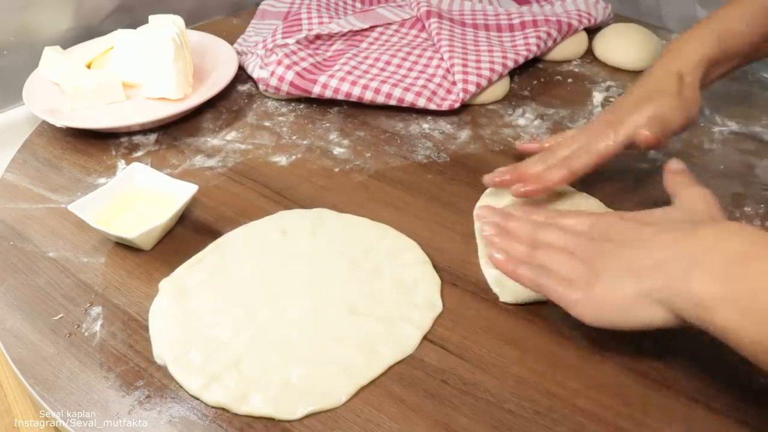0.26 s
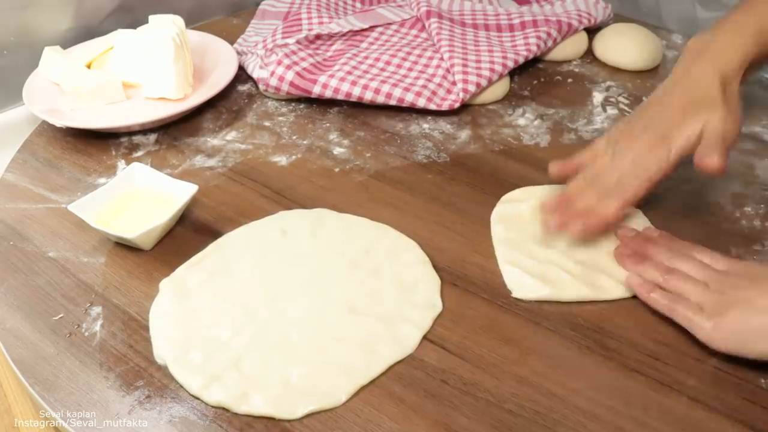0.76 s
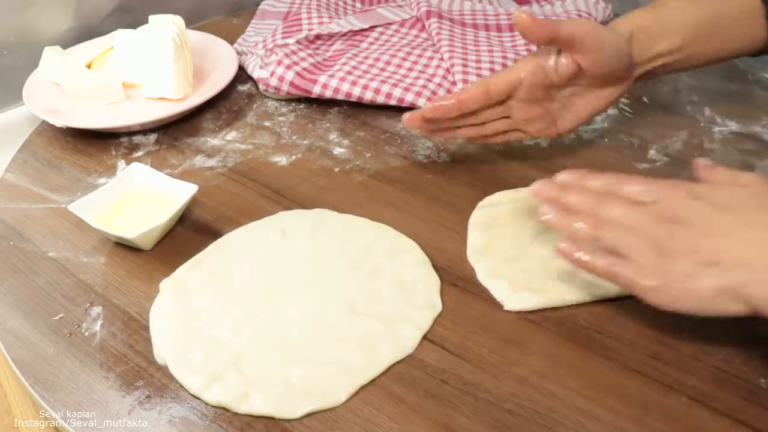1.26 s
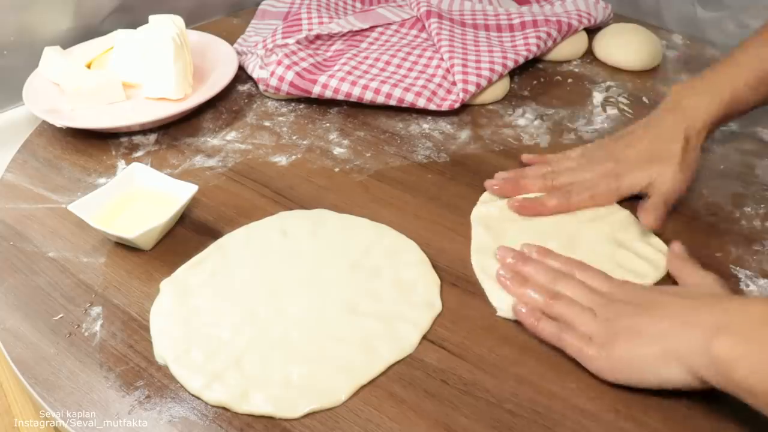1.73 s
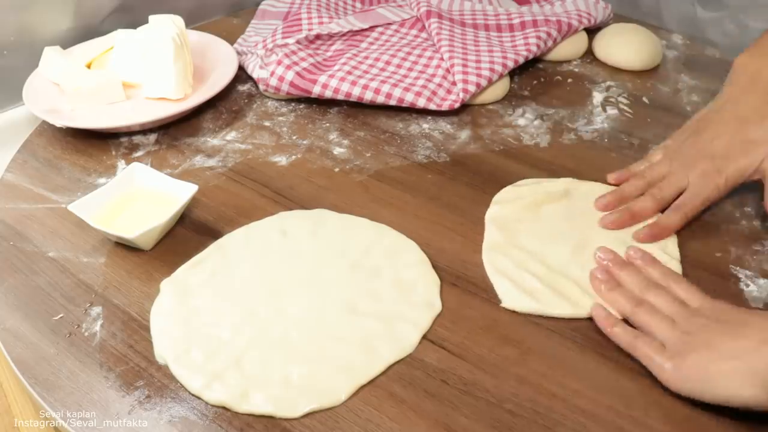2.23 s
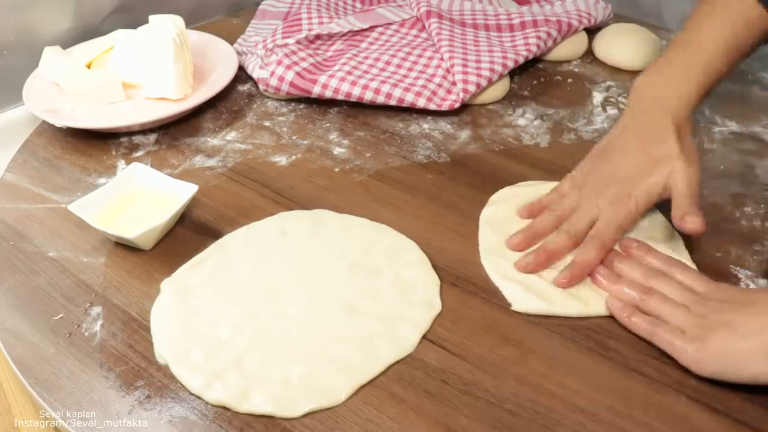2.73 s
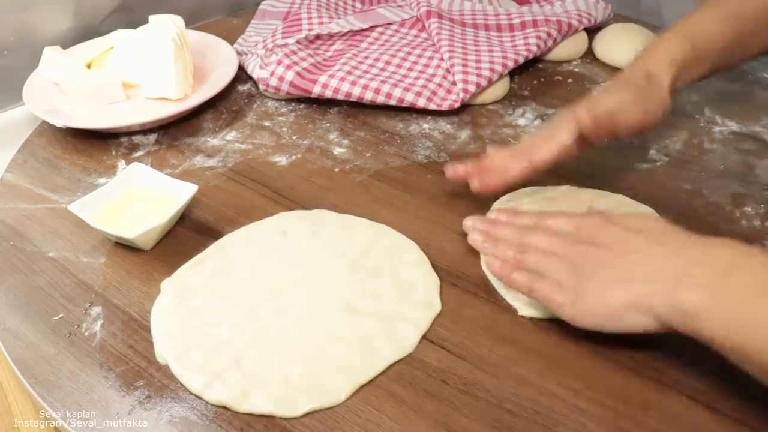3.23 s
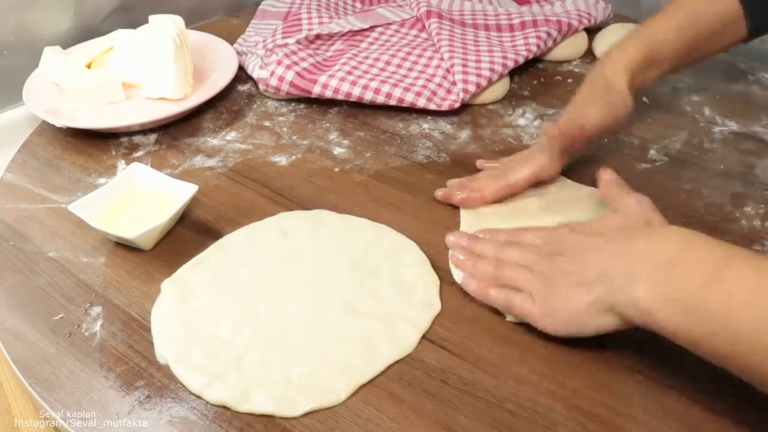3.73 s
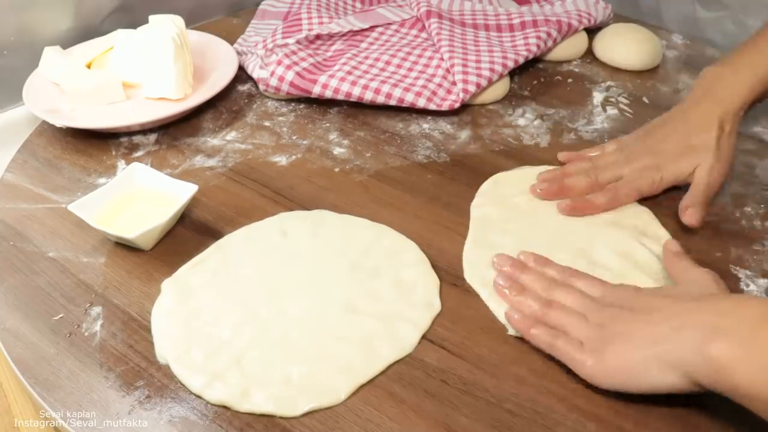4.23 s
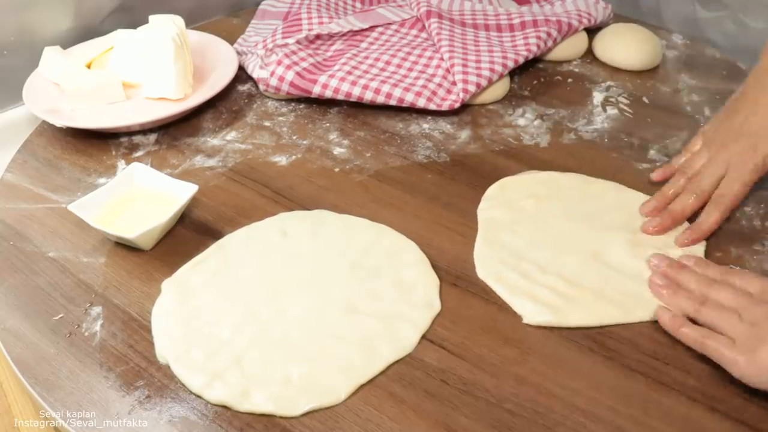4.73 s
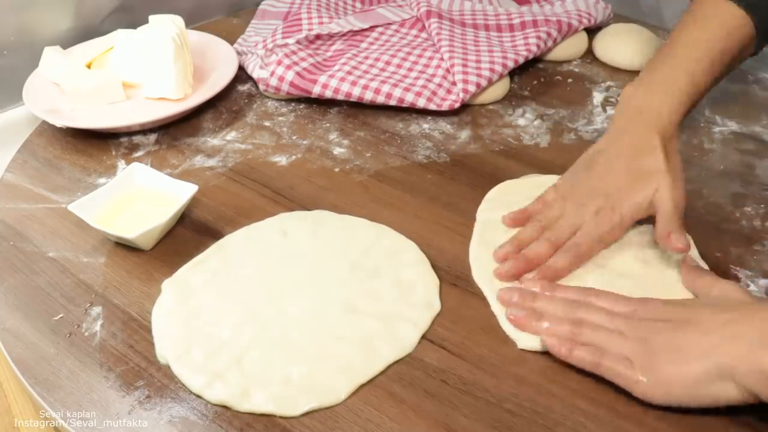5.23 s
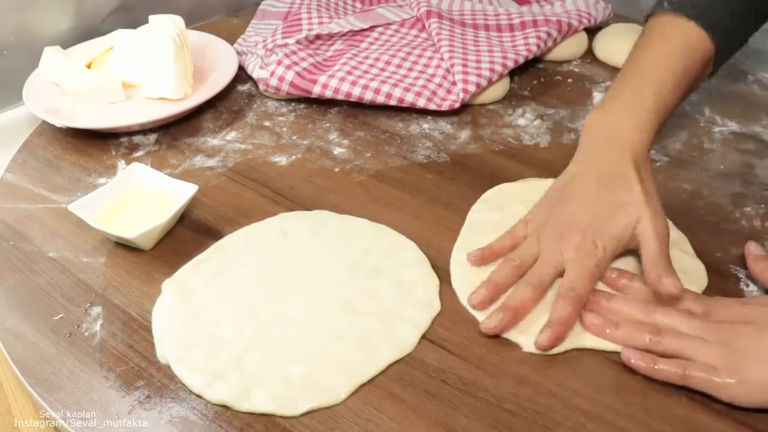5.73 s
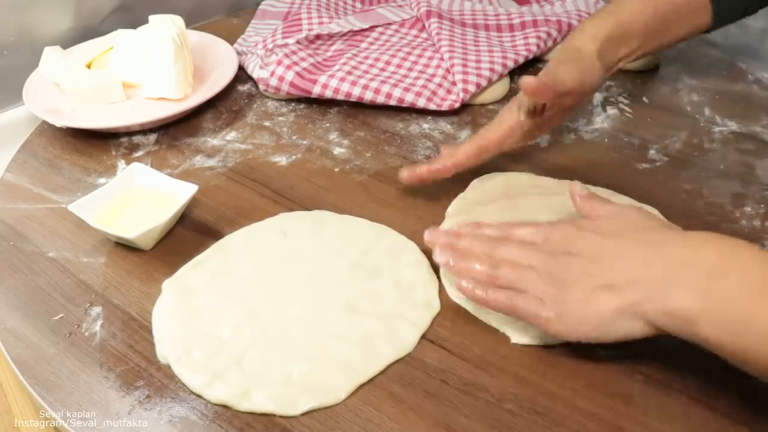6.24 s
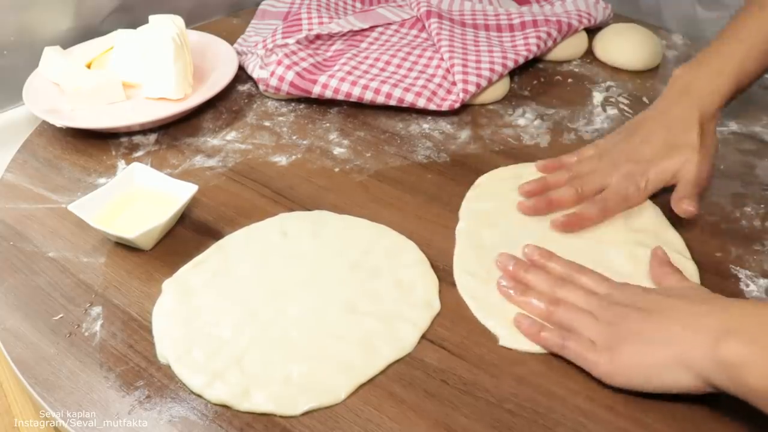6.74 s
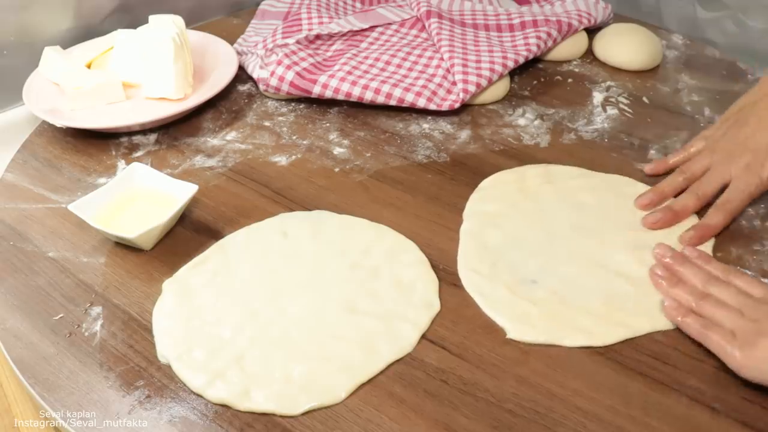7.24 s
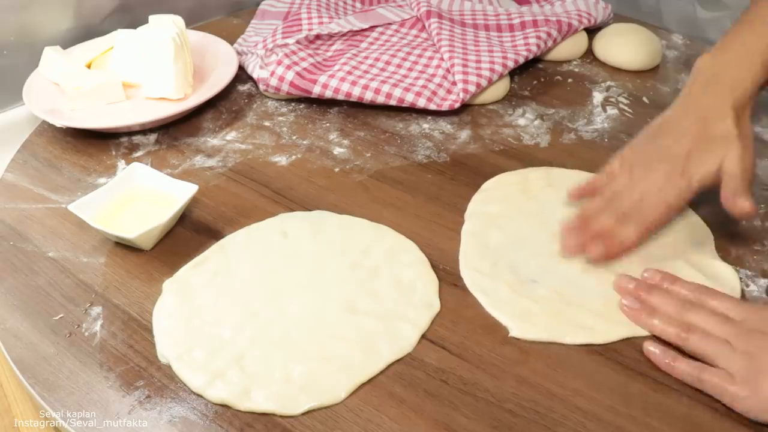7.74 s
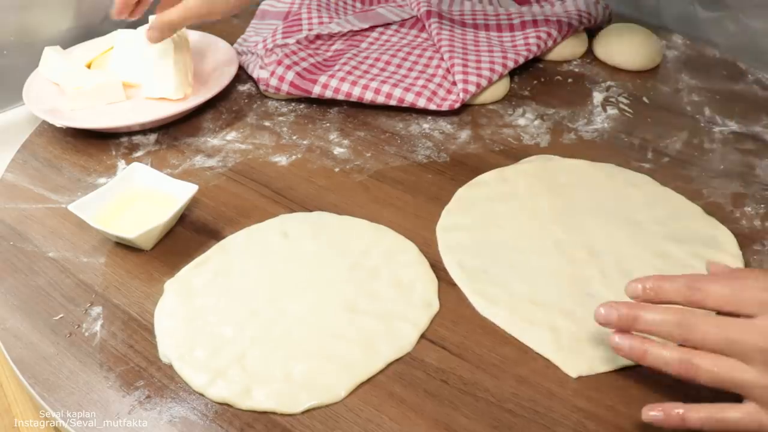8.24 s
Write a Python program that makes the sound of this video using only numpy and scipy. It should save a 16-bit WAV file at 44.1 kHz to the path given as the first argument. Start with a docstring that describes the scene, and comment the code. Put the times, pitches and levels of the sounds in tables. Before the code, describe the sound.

Oily fingers slap and press soft dough on a wooden board about four times a second, with dull thumps, sticky pops and faint peeling rustles.

```python
"""Oiled fingers pat soft dough flat on a round wooden board in a small kitchen.
Each pat thumps the board and its table (ringing modes) and smacks air out from under the fingers (lumpy noise).
Skin peels off the dough with small pops and a rustle, and at times brushes the oiled wood with a narrow whistle.
The kitchen answers briefly at two microphone ports; a cut at 8 s ends every ring and echo of the hands.
Behind it all lies steady noise with a thin, slightly wavering appliance tone."""
import sys
import numpy as np
from scipy import signal
from scipy.fft import rfft, irfft, next_fast_len
from scipy.io import wavfile

SR = 44100
rng = np.random.default_rng(int(sys.argv[2]) if len(sys.argv) > 2 else 0)


def inscribe(sig):
    """Save sig as 16-bit PCM at rate SR to the path in sys.argv[1].

    A 1-D sig is mono; a 2-D sig holds one channel per row.
    Samples are clipped to [-1, 1] before scaling.
    """
    pcm = np.round(np.clip(np.atleast_2d(sig).T, -1, 1) * 32767)
    wavfile.write(sys.argv[1], SR, pcm.astype(np.int16))


N = 373968
TIME = np.arange(N) / SR
CUT_S = 8.001  # a cut at 8 s ends every ring and echo of the hands; the background runs on


def from_db(db):
    """Amplitude ratio of a level in dB."""
    return 10 ** (np.asarray(db) / 20)


def rms_one(x):
    """Scales a signal to an rms of one."""
    return x / np.sqrt(np.mean(x ** 2) + 1e-20)


def at_hz(points, hz, axis=1):
    """Reads a column of a table at a frequency, straight over log frequency."""
    points = np.array(points)
    return np.interp(np.log(hz), np.log(np.maximum(points[:, 0], 1)), points[:, axis])


def band(x, low_hz, high_hz):
    """Band-pass filter."""
    sos = signal.butter(2, [low_hz, min(high_hz, 20000)], "band", fs=SR, output="sos")
    return signal.sosfilt(sos, x)


def add(track, start_s, sound):
    """Lays a sound on the track; what began before the cut ends there."""
    start = round(start_s * SR)
    limit = round(CUT_S * SR) if start_s < CUT_S else N
    end = min(start + len(sound), limit)
    track[start:end] += sound[:end - start]


def noise_and_strengths():
    """Returns white noise and random strengths up to a ceiling, from which callers make uneven grains."""
    return rng.standard_normal(N), np.minimum(rng.exponential(1, N), 3)


# Pats on the dough; the faint ones just ahead of a strong one are fingertips touching first.
# Columns: start_s, smack_db (1.4-7 kHz), body_db (smack, 0.4-2.5 kHz), spread_ms (of the landing),
# sway_db (table), low_db, middle_db, high_db (board), press_ms, damping (by the hand, ratio)
PATS = [(0.0044, -51, -43, 1.3, -47, -35.5, -45.5, -43, 6.4, 1.8),
        (0.2353, -11, -11.5, 2.3, -37, -29, -24.5, -21.5, 12, 1.1),
        (0.4642, -11.5, -7, 0.44, -50, -22, -28.5, -28, 10, 0.76),
        (0.664, -30, -30, 1.8, -59, -41, -37, -29, 2.7, 2.2),
        (0.6686, -20.5, -23.5, 2, -44, -40, -36, -26, 14, 1.3),
        (0.905, -36, -31, 2.8, -37, -40, -57, -48, 11, 1.3),
        (0.9466, -25, -35, 1.6, -49, -21, -23, -31, 9.5, 1.2),
        (0.9538, -22, -19, 1.2, -57, -35, -30, -38, 6.6, 1.3),
        (1.2061, -23.5, -19.5, 2.5, -45, -25.5, -21.5, -33, 5.3, 0.92),
        (1.5114, -21, -26.5, 7, -39.5, -36.5, -37, -38.5, 10, 0.5),
        (1.8257, -12.5, -12, 5.9, -40, -20, -27, -22, 9.9, 0.66),
        (2.0878, -15, -10.5, 0.92, -39, -20.5, -23.5, -17, 5.7, 0.85),
        (2.312, -21.5, -17, 2.7, -35, -28, -37.5, -22, 21.4, 1.14),
        (2.529, -48, -24.5, 2, -55, -32, -35, -33, 3, 2.5),
        (2.5348, -24.5, -24, 0.41, -40, -21, -26.5, -24, 14, 3.4),
        (2.7758, -40, -29.5, 1.9, -36, -31, -43, -35, 8.4, 0.94),
        (2.8193, -21.5, -14, 3.3, -47, -20.5, -20.5, -20.5, 11, 1.14),
        (3.0815, -30.5, -26, 1.9, -43, -29.5, -28.5, -36, 5.3, 0.98),
        (3.4183, -25.5, -33, 6, -50, -36.5, -38, -37.5, 13, 1.04),
        (3.7344, -14.5, -11.5, 5.8, -37, -22, -35, -21, 13, 0.9),
        (4.0435, -17, -13.5, 3.1, -39.5, -19.5, -24, -25, 12.5, 1),
        (4.2954, -9.5, -9.5, 1.06, -45, -24, -25.5, -23, 5.9, 0.51),
        (4.5439, -20, -17.5, 4.7, -58, -22, -33, -20.5, 19, 1.7),
        (4.769, -67, -35, 2.1, -55, -41, -42, -30, 3.8, 2.5),
        (4.7757, -26, -29.5, 1.2, -36, -26, -43, -24.5, 16.6, 2.2),
        (5.0642, -25, -20, 4.9, -30.5, -28, -28.5, -29.5, 40.5, 3.2),
        (5.3282, -29.5, -21, 1.7, -40, -34, -39.5, -40, 9.4, 0.38),
        (5.594, -24.5, -24.5, 7.3, -47, -31.5, -37, -37, 22, 0.68),
        (5.8621, -31, -27, 0.9, -39.5, -27, -30, -34, 3.4, 1.05),
        (6.1545, -25.5, -24, 5.5, -43, -25.5, -26, -30, 5.9, 0.68),
        (6.1844, -36, -33, 0.81, -30, -19, -30.5, -50, 13, 2.3),
        (6.496, -25, -37, 1.2, -48, -29, -39, -40, 3, 2.7),
        (6.5003, -13, -10.5, 1.2, -39.5, -26, -27.5, -28.5, 5.7, 0.47),
        (6.772, -9.5, -12, 5.3, -50, -21, -25.5, -22.5, 6.1, 0.51),
        (7.0324, -36, -20, 2.6, -38.5, -20.5, -27, -31, 14, 1.2),
        (7.264, -38, -34, 2.1, -57, -29, -38, -29, 2.6, 1.7),
        (7.2711, -18, -19, 0.7, -44, -24, -36, -25.5, 7.7, 1.2),
        (7.5748, -32, -27, 2.6, -54, -37.5, -35, -30, 20, 1.2),
        (7.6016, -14.5, -21, 1.05, -35, -23.5, -29.5, -19.5, 5.7, 1.4),
        (7.876, -28, -26.5, 4.1, -56, -30, -28, -27.5, 22, 2.3),
        (7.9039, -21.5, -24.5, 1.6, -37, -20, -23, -21, 9.3, 1.5),
        (8.0795, -22, -21.5, 1.7, -38, -22.5, -31, -45, 7, 1.6)]
# Ringing modes of table and board: pitch_hz, level_db (relative), t60_s (before the hand's damping)
WOOD = [(39.5, -4, 0.35), (47.5, 2.5, 1), (95, -3.5, 0.53), (108.6, 1.5, 0.33), (162.7, 1, 0.059),
        (184.6, 5, 0.12), (205.7, -4, 0.12), (232.8, -6, 0.44), (261.7, 6.5, 0.19), (301.6, -7.5, 0.32),
        (336.4, -9.5, 0.17), (372, -1.5, 0.19), (401, -5.5, 0.28), (440, -14, 0.12), (486.2, -7, 0.075)]
# Borders between table sway, table top, low, middle and high board [Hz]
WOOD_PARTS_HZ = [70, 140, 215, 330]
TOP_FOLLOWS_BOARD, TOP_DB = 0.62, -2.5  # the table top's level lies between sway and low board
GRIP = 1.21     # the hand damps harder the longer it rests: the fade steepens with this power of time
GRIP_S = 0.038  # time after the press at which the fade equals that of a plain exponential ring


def thumps():
    """Every pat drives all wood modes while the dough gives way; then they die, damped by the resting hand."""
    out = np.zeros(N)
    phases = rng.uniform(-1.52, 1.57, (len(PATS), len(WOOD)))
    variations_db = rng.normal(0, 2.3, phases.shape)  # each mode's level varies at random from pat to pat
    for pat, pat_phases, pat_variations_db in zip(PATS, phases, variations_db):
        sway_db, low_db, middle_db, high_db, press_ms, damping = pat[4:]
        top_db = TOP_DB + sway_db + TOP_FOLLOWS_BOARD * (low_db - sway_db)
        parts_db = [sway_db, top_db, low_db, middle_db, high_db]
        for (hz, mode_db, t60), phase, variation_db in zip(WOOD, pat_phases, pat_variations_db):
            press = press_ms / 1000 + 2.23 / hz  # s; slow modes take longer to swell
            t = TIME[:min(SR // 2, round((press + t60 / damping) * SR))]
            swell = np.sin(np.pi / 2 * np.minimum(t / press, 1)) ** 0.62
            rested = np.maximum(t - press, 0) / GRIP_S
            fade_db = 60 * GRIP_S * rested ** GRIP * damping / t60
            part_db = parts_db[np.searchsorted(WOOD_PARTS_HZ, hz)]
            gain = from_db(part_db + mode_db + variation_db - fade_db)
            add(out, pat[0], gain * swell * np.sin(2 * np.pi * hz * t + phase))
    return out


SMACK_RISE = 0.68                            # share of the landing's spread
SMACK_DECAY_MS, SMACK_DECAY = 2.96, 0.85     # a base plus a share of the spread, before each band's slowness
UPPER_BODY_DB = -5.5                         # upper half of the body against the lower
AIR_DB, AIR_GROWTH = -10, 1.05               # the top band grows faster than the smack


def smacks():
    """Air and oil squeezed out finger by finger: lumpy noise, later and longer in the low bands."""
    out, t_ms = np.zeros(N), TIME[:SR // 8] * 1000
    noise, strength = noise_and_strengths()
    grains = noise * from_db(3.0 * strength)
    lumps = rms_one(band(rng.standard_normal((2, N)), 55, 196))  # fingers do not land together
    starts, smack_db, body_db, spreads_ms = np.transpose(PATS)[:4]
    # levels_db, low_hz, high_hz, slowness
    bands = [(body_db, 422, 1456, 1.79),
             (body_db + UPPER_BODY_DB, 1057, 2575, 1.57),
             (smack_db, 1420, 6950, 0.98),
             (AIR_DB + AIR_GROWTH * smack_db, 8000, 15500, 0.69)]
    for k, (levels_db, low_hz, high_hz, slowness) in enumerate(bands):
        envelope = np.zeros(N)
        for start, level_db, spread_ms in zip(starts, levels_db, spreads_ms):
            rise_ms = slowness * SMACK_RISE * spread_ms
            decay_ms = slowness * (SMACK_DECAY_MS + SMACK_DECAY * spread_ms)
            swell = (1 - np.exp(-t_ms / rise_ms)) ** 1.68
            add(envelope, start, from_db(level_db) * swell * np.exp(-t_ms / decay_ms))
        lumpiness = from_db(2.49 * lumps[k // 2])  # one for the two body bands, one for the two above
        out += envelope * lumpiness * rms_one(band(grains, low_hz, high_hz))
    return out


# Air pockets that burst under a landing or lifting finger: start_s, level_db, pitch_hz
POPS = [(0.108, -24, 6700), (0.238, -12, 3130), (0.324, -34, 5750), (0.371, -25.5, 7000),
        (0.4657, -3.5, 5360), (0.9082, -24, 5550), (0.9487, -12.5, 2340), (0.9564, -15, 5480),
        (1.2121, -19, 2550), (1.5194, -14, 3640), (1.531, -20, 4240), (1.8272, -5.5, 4150),
        (1.845, -21, 3800), (2.087, -29, 7040), (2.3155, -34, 3860), (2.3246, -17.5, 7500),
        (2.537, -17.5, 10300), (2.8205, -14, 4600), (2.8747, -33.5, 10700), (3.0857, -22.5, 2190),
        (3.426, -28, 6050), (3.5714, -34.5, 2500), (3.7346, -17, 3800), (3.7513, -17.5, 2980),
        (3.8538, -24, 2940), (4.0485, -12, 3580), (4.1458, -15.5, 4130), (4.2976, 0.5, 5700),
        (4.5473, -31, 8950), (5.33, -23.5, 3240), (5.394, -26, 5250), (5.4177, -32, 6250),
        (5.5955, -22, 2980), (5.861, -25, 3480), (6.186, -25.5, 5650), (6.2444, -32, 6200),
        (6.3008, -27, 7800), (6.5052, -3.5, 3980), (6.778, -9, 4340), (6.7868, -10, 5200),
        (7.0367, -14.5, 5370), (7.0518, -20.5, 4200), (7.0769, -20.5, 6850), (7.274, -27, 6160),
        (7.575, -33, 3350), (7.6042, -29, 5260), (7.7616, -35.5, 11800), (7.906, -17, 5300),
        (8.0808, -17.5, 3120), (8.33, -38, 9000)]
POP_CYCLES = 0.9  # time constant of both swell and decay
EDGE_DB = -9.5    # sharp edge against the burst


def pops():
    """A burst pocket swells and rings a few cycles, with a sharp edge on top."""
    out, t = np.zeros(N), TIME[:400]
    edge = from_db(EDGE_DB) * np.sin(2 * np.pi * 13000 * t) * np.exp(-t / 0.00014)
    for start, level_db, hz in POPS:
        age = t * hz / POP_CYCLES
        ring = np.sin(2 * np.pi * hz * t) * age * np.exp(1 - age)
        add(out, start, from_db(level_db) * (ring + edge))
    return out


# Fingers peel off the dough after a pat; the last row is a long soft rustle as the hand reaches away.
# Columns: start_s (of the hold), hold_s, swish_db, hiss_db
PEELS = [(0.07, 0.059, -48.5, -51), (0.33, 0.075, -52.5, -55.5), (0.573, 0.06, -48.5, -55.5),
         (0.8, 0.017, -58, -59), (1.06, 0.038, -57.5, -58.5), (1.303, 0.033, -51.5, -54.5),
         (1.628, 0.06, -50, -55), (1.897, .012, -54, -56), (1.973, 0.031, -52, -58.5),
         (2.216, 0.037, -57, -62), (2.452, 0.012, -52.5, -54.5), (2.64, 0.021, -69, -65),
         (2.877, .004, -50, -52), (2.973, 0.05, -54, -60.5), (3.162, 0.048, -53, -56.5),
         (3.532, 0.074, -52, -57), (3.854, 0.0096, -42, -49), (4.147, 0.021, -44.5, -53),
         (4.38, 0.078, -52, -60), (4.678, 0.016, -55.5, -57.5), (4.897, 0.033, -76, -68),
         (5.188, 0.046, -55.5, -58), (5.366, 0.14, -54, -58.5), (5.696, 0.043, -55, -59),
         (5.927, .004, -69, -61), (5.97, 0.0096, -51.5, -54), (6.293, 0.04, -49.5, -54),
         (6.642, 0.028, -45, -50.5), (6.88, 0.065, -49.5, -55.5), (7.066, .012, -42, -49),
         (7.194, 0.011, -51, -54), (7.446, 0.023, -57.5, -59.5), (7.715, 0.0054, -51, -51),
         (7.768, 0.007, -47.5, -51), (7.963, 0.069, -58, -64), (8.177, 0.033, -66, -71),
         (8.246, 0.21, -54.5, -61.5)]
PEEL_LEAD_S = 0.04  # the rise begins this long before the hold
PEEL_RISE_DB_PER_S, PEEL_FALL_DB_PER_S, HISS_FALL_DB_PER_S = 902, 353, 450
# After each landing the fingers settle into the dough; SETTLE_FOLLOWS is the share of smack_db added
SETTLE_SWISH_DB, SETTLE_HISS_DB, SETTLE_FOLLOWS, SETTLE_FALL_DB_PER_S = -38.5, -45.5, 0.28, 185


def rustle():
    """Broad swish and thin hiss: tiny tears of the oil film as fingers settle and peel; last, a hand reaching."""
    swish, hiss, t = np.zeros(N), np.zeros(N), TIME[:SR // 3]
    for start, smack_db, *_ in PATS:
        settle_db = SETTLE_FOLLOWS * smack_db - SETTLE_FALL_DB_PER_S * t
        add(swish, start, from_db(SETTLE_SWISH_DB + settle_db))
        add(hiss, start, from_db(SETTLE_HISS_DB + settle_db))
    for start, hold, swish_db, hiss_db in PEELS:
        rise_db = PEEL_RISE_DB_PER_S * np.maximum(PEEL_LEAD_S - t, 0)
        after = np.maximum(t - PEEL_LEAD_S - hold, 0)
        add(swish, start - PEEL_LEAD_S, from_db(swish_db - rise_db - PEEL_FALL_DB_PER_S * after))
        add(hiss, start - PEEL_LEAD_S, from_db(hiss_db - rise_db - HISS_FALL_DB_PER_S * after))
    noise, strength = noise_and_strengths()
    grains = noise * from_db(2.0 * strength)
    # the film tears in uneven runs
    patches = from_db(1.8 * rms_one(band(rng.standard_normal(N), 24, 106)))
    swish_noise = rms_one(band(grains, 830, 7060))
    hiss_noise = rms_one(band(grains, 9300, 20000))
    return patches * (swish * swish_noise + hiss * hiss_noise)


# Narrow whistly brushes of skin on the oiled wood: start_s, length_s, centre_hz, level_db (before the swell)
BRUSHES = [(0.798, 0.031, 6100, -54), (2.981, 0.19, 5600, -60), (3.9, 0.1, 6250, -58),
           (4.348, 0.2, 5700, -56.5), (4.66, .06, 5570, -56), (5.385, 0.056, 5400, -51)]


def brushes():
    """Skin sliding on oiled wood: noise through a narrow band, swelling and fading."""
    out = np.zeros(N)
    noises = rng.standard_normal((len(BRUSHES), SR // 4))
    for (start, length, hz, level_db), noise in zip(BRUSHES, noises):
        narrow = rms_one(band(noise, hz - 250, hz + 250))[:round(length * SR)]
        add(out, start, from_db(level_db) * narrow * np.hanning(len(narrow)) ** 0.5)
    return out


# How alike diffuse sound is at the two ports: pitch_hz, likeness (1 same, 0 unrelated, -1 opposite)
LIKENESS = [(60, 0.68), (180, 0.97), (550, 0.74), (1650, -0.058), (4970, -0.38), (15000, 0.16)]


def diffuse(size, shape):
    """Sound from all around: stereo noise in half-octave bands, each with its likeness and gain shape(hz)."""
    out, edges = 0, 28 * 2 ** np.arange(0, 9.6, 0.5)
    white = rng.standard_normal((2, 2, size))  # two pairs, taken in turn by neighbouring bands
    for k, (low_hz, high_hz) in enumerate(zip(edges, edges[1:])):
        mid, side = band(white[k % 2], low_hz, high_hz)
        hz = np.sqrt(low_hz * high_hz)
        alike = np.clip(at_hz(LIKENESS, hz), -1, 1)
        stereo = np.sqrt(1 + alike) * mid + np.sqrt(1 - alike) * side * [[1], [-1]]
        out = out + shape(hz) * stereo
    return out


# Kitchen echo: pitch_hz, t60_s, level_db (relative)
ROOM = [(102, 0.66, -16), (250, 0.22, -11.5), (617, 0.24, 0), (1860, 0.25, -2), (4800, 0.25, -6.5),
        (9000, 0.21, -7), (11500, 0.15, -11.5), (17000, 0.3, -14.5)]
# Microphone response, the same at both ports: pitch_hz, level_db
MICROPHONE = [(400, -1.5), (2200, -2.5), (4000, -4.5), (5800, -2.5), (7200, -2.5), (10500, 7.5),
              (13300, 3.5), (14800, 3), (16000, -3)]
# Shading of the left port: pitch_hz, level_db (left minus right)
LEFT_SHADE = [(60, 1.5), (240, 0.8), (950, 0.1), (3770, -1.2), (9000, -1), (15000, -4.5)]
LEFT_LAG_S = 2 / 44100  # lag of the left port at low frequencies
PORT_TURN = 1.93        # most radians by which the left port trails


def heard(x):
    """Straight path to two ports (left later and shaded) plus the kitchen's echo, noise dying band by band."""
    t = TIME[:SR // 2]

    def echo_gain(hz):
        t60 = at_hz(ROOM, hz)
        fading = from_db(at_hz(ROOM, hz, axis=2) - 60 * t / t60)
        return fading / np.sqrt(t60 * SR / 14)  # a longer echo gets no more energy

    echo = diffuse(len(t), echo_gain)
    echo *= 1 - np.exp(-(t / 0.00022) ** 2)  # leaves the first instant to the straight path
    size = next_fast_len(N + len(t))
    hz = np.maximum(np.arange(size // 2 + 1) * SR / size, 1)
    left_turn = PORT_TURN * np.tanh(2 * np.pi * hz * LEFT_LAG_S / PORT_TURN)
    straight = np.array([np.exp(-1j * left_turn), np.ones(len(hz))])
    ports = from_db(at_hz(MICROPHONE, hz) + at_hz(LEFT_SHADE, hz) / 2 * [[1], [-1]])
    return irfft(rfft(x, size) * (straight + rfft(echo, size)) * ports, size)[:, :N]


# Steady kitchen noise: pitch_hz, level_db (per Hz, relative)
BACKGROUND = [(18, -34), (30, -14), (64, 0.5), (140, -5), (256, 2), (532, -6.5), (575, -1), (639, -6),
              (830, -14.5), (2020, -16.5), (2180, -20.5), (5740, -24.5), (10700, -34), (13600, -38),
              (15500, -28)]
BACKGROUND_DB = -47            # rms of the noise
TONE_HZ, TONE_DB = 579, -57    # appliance tone, rms


def background():
    """Steady kitchen noise from all around and an appliance tone whose phase drifts slightly at random."""
    noise = rms_one(diffuse(N, lambda hz: from_db(at_hz(BACKGROUND, min(hz, 14000)))))
    waver = np.cumsum(rng.standard_normal(N)) * 0.0088  # radians
    tone = np.sqrt(2) * np.sin(2 * np.pi * TONE_HZ * TIME + waver)
    return from_db(BACKGROUND_DB) * noise + from_db(TONE_DB) * tone


def scene():
    """The hands as heard before and after the cut, each part with its own echo, over the background."""
    hands = thumps() + smacks() + pops() + rustle() + brushes()
    before = TIME < CUT_S
    return heard(hands * before) * before + heard(hands * ~before) + background()


def record(dry):
    """Peaks are rounded, then the top is cut: 80 dB down from 16250 Hz upward."""
    rounded = 1.2 * np.tanh(dry / 1.2)
    return signal.sosfilt(signal.cheby2(20, 80, 16250, fs=SR, output="sos"), rounded)


dry = scene()
out = record(dry)
inscribe(out)
```